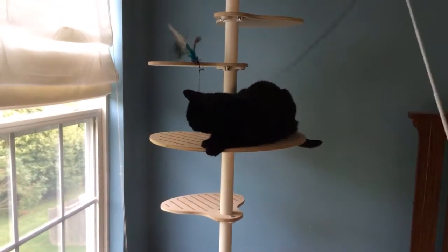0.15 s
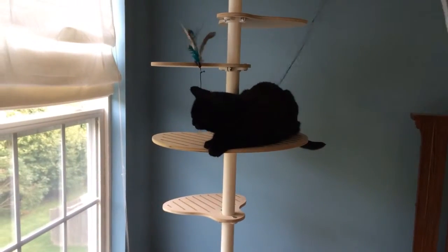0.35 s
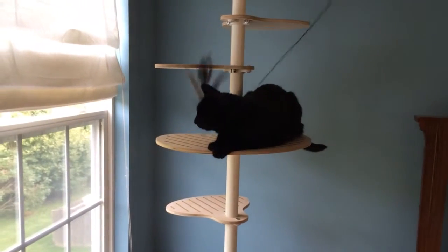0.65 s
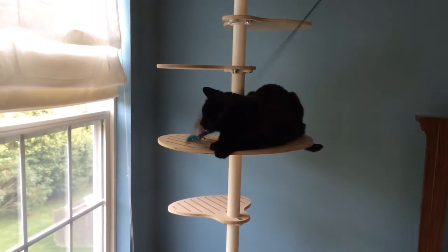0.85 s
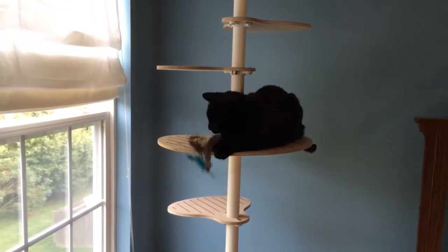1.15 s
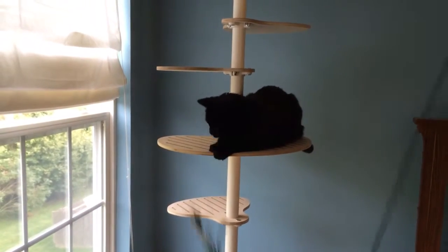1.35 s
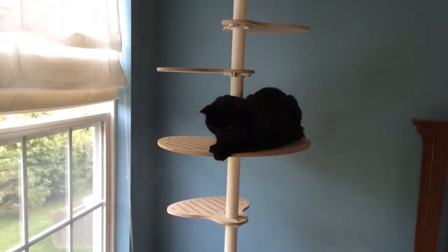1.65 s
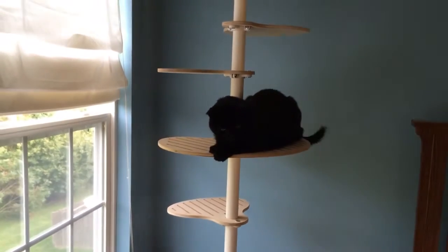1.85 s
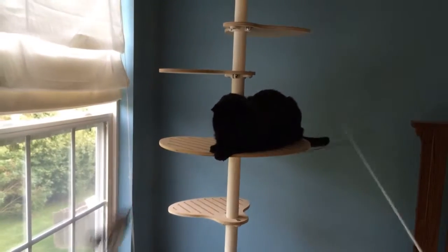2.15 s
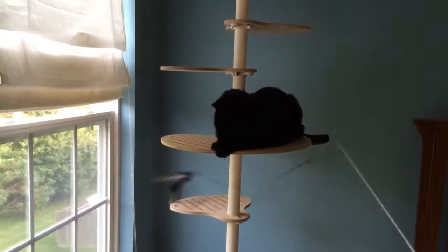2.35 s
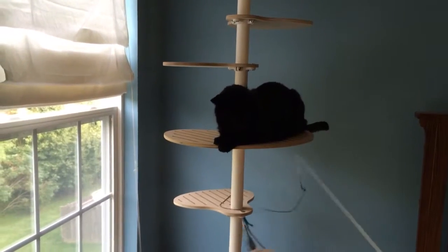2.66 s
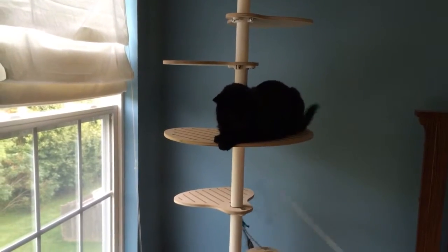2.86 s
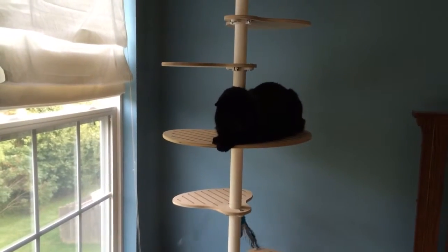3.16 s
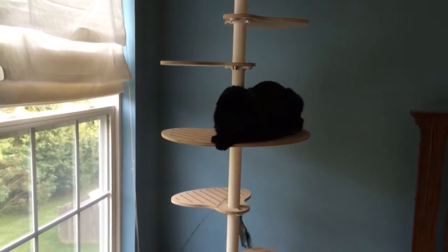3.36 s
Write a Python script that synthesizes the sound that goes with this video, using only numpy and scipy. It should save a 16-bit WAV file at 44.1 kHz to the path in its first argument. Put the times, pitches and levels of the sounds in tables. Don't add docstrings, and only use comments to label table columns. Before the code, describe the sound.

A toy rod taps a wooden shelf, slaps another hard, then rattles and ticks on a pole, with faint feather rustles and a tiny metal clink; small soft-furnished room, faint hiss and low hum.

```python
import sys
import numpy as np
from scipy import signal
from scipy.fft import rfft, irfft, next_fast_len
from scipy.io import wavfile

SR = 44100
rng = np.random.default_rng(int(sys.argv[2]) if len(sys.argv) > 2 else 0)


def to_wav(sig):
    pcm = np.clip(np.atleast_2d(sig), -1, 1) * 32767
    pcm = np.round(pcm).astype(np.int16)
    wavfile.write(sys.argv[1], SR, pcm.T)


def gain_from_db(level_db):
    decades = np.asarray(level_db, float) / 20
    return 10 ** decades


N = 154350
GRIT_DB = 1

# mode_hz, level_db, t60_s
POLE_MODES = [(480, -14, .12), (770, -18, .09), (1060, 0, .08), (1320, -1, .045), (1420, -3, .06),
              (1590, 1, .05), (1860, -6, .03), (1990, 2, .075), (2170, -3, .04), (2980, -9, .035),
              (3450, -5, .035), (3790, -5, .03), (4450, -8, .035), (5570, -10, .03)]
# freq_hz, level_db
POLE_CRACK = [(850, -31), (1100, -10.5), (2000, 1), (2600, -5.5), (3800, -5), (7000, -8.5), (15500, -25.5)]


def unit(x):
    return x / np.sqrt(np.mean(x ** 2) + 1e-20)


def unit_energy(x):
    return x / np.linalg.norm(x, axis=-1, keepdims=True)


def along(points, hz):
    point_hz, values = np.transpose(points)
    return np.interp(np.log(hz + 1), np.log(point_hz + 1), values)


def filtered(x, response):
    size = next_fast_len(x.shape[-1] + 8192)
    spectrum = rfft(x, size) * response(np.fft.rfftfreq(size, 1 / SR))
    return irfft(spectrum, size)[..., :x.shape[-1]]


def coloured(points):
    low_hz, high_hz = points[0][0], points[-1][0]

    def gain(hz):
        low_edge = np.clip(hz / low_hz, 0, 1) ** 5
        high_edge = np.clip(high_hz / (hz + 1), 0, 1) ** 2
        return gain_from_db(along(points, hz)) * low_edge * high_edge
    return gain


def grit(size, spread_db):
    return unit(rng.standard_normal(size) * gain_from_db(spread_db * rng.exponential(size=size)))


def air():
    # freq_hz, level_db per Hz
    rumble_colour = [(30, -22.5), (62, -5.5), (90, -9), (150, -14), (219, -11), (259, -18), (400, -19.5),
                     (600, -38.5)]
    # freq_hz, level_db per Hz
    hiss_colour = [(290, -21.5), (500, -3), (530, -6), (1720, -11), (1900, -11.5), (15400, -20)]
    rumble = unit(filtered(rng.standard_normal(N), coloured(rumble_colour)))
    hiss = unit(filtered(rng.standard_normal(N), coloured(hiss_colour)))
    opposed_s = 1.895
    turn = 2 * np.pi * (np.arange(N) / SR - opposed_s)
    first_motor = gain_from_db(-68) * np.sin(120.18 * turn)
    second_motor = gain_from_db(-71.5) * np.sin(116.82 * turn)
    return gain_from_db(-68) * rumble + gain_from_db(-75) * hiss + first_motor - second_motor


def feathers():
    # start_s (the peak), level_db, rise_s, fall_s, share of fine tips (0-1)
    brushes = [(.03, -74.5, .01, 0.013, 1), (.665, -64.5, .014, 0.022, 0.33), (1.07, -66, .004, .012, 0.4),
               (1.15, -68.5, .025, .022, 0.73), (1.185, -70, .011, 0.038, 0.8), (1.24, -74, .02, .04, 0.47),
               (1.82, -81, .01, .01, 0.9), (1.839, -70.5, .002, 0.014, 1), (1.96, -60.5, .002, .008, 0.02),
               (1.975, -66, .003, 0.018, 0.4), (2.016, -73, .003, 0.0065, .2),
               (2.022, -70, .003, 0.0065, 0.1), (2.44, -66.5, .034, 0.066, .5),
               (2.779, -63, .0032, 0.024, 0.36), (3.05, -73.5, .03, .05, 0.86),
               (3.201, -66.5, .029, .05, 0.06), (3.34, -68, .026, 0.033, 0.1)]
    # freq_hz, level_db
    vane_colour = [(2200, -4), (3500, 0.5), (7000, -1.5), (12000, -12), (15500, -11)]
    # freq_hz, level_db
    tip_colour = [(4000, -10), (7000, -3), (10000, -2.5), (15500, -6.5)]
    t = np.arange(N) / SR
    vanes = unit(filtered(grit(N, GRIT_DB), coloured(vane_colour)))
    tips = unit(filtered(grit(N, GRIT_DB), coloured(tip_colour)))
    out = np.zeros(N)
    for peak_s, level_db, rise_s, fall_s, fine in brushes:
        swell = np.exp(-np.where(t < peak_s, (peak_s - t) / rise_s, (t - peak_s) / fall_s))
        out += gain_from_db(level_db) * swell * ((1 - fine) * vanes + fine * tips)
    return out


def room(x):
    # freq_hz, t60_s
    decay_times = [(300, 0.34), (1200, 0.23), (4000, .24), (10000, 0.16), (15000, 0.097)]
    delay_s, late_db, late_longer = .005, -14.5, 2.37
    hz, t, grains = signal.stft(grit(SR // 2, .8), SR, nperseg=256)
    fall_db = -60 * t / along(decay_times, hz)[:, None]
    decay = np.hypot(gain_from_db(fall_db), gain_from_db(late_db + fall_db / late_longer))
    tail = signal.istft(grains * decay, SR, nperseg=256)[1]
    delayed = np.pad(x, (round(delay_s * SR), 0))
    return signal.fftconvolve(delayed, tail / np.linalg.norm(tail))


def near_db(hz, pitch_hz, reach_octaves):
    return -3 * (np.log2((hz + 1) / pitch_hz) / reach_octaves) ** 2


def knocks(contacts, modes, crack, low_hz, room_db):
    attack_s, swell_s = .0007, .001
    pitch_reach, reach_at_s = .3, .008
    crack_reach = 2.23
    scatter_db, detune = 1.2, .002
    ring_in_room_db = -2
    lead = 512
    out, t = np.zeros(N + SR), np.arange(SR // 5) / SR
    hz, mode_db, t60 = np.transpose(modes)[:, :, None]
    for start_s, level_db, length_s, pitch_hz, crack_db in contacts:
        push = grit(len(t), GRIT_DB) * (1 - np.exp(-t / attack_s)) * np.exp(-(t / length_s) ** 2)
        loaded_hz = hz * (1 + detune * rng.standard_normal(hz.shape))
        free = gain_from_db(-60 * t / t60) * np.sin(2 * np.pi * loaded_hz * t) * (1 - np.exp(-t / swell_s))
        push = np.pad(push, (lead, 0))[:len(t)]

        reach = pitch_reach * np.clip(reach_at_s / length_s, .3, 2.5)
        share_db = mode_db + near_db(hz, pitch_hz, reach) + scatter_db * rng.standard_normal(hz.shape)
        driven = signal.fftconvolve(push[None], free, axes=1)[:, :len(t)]
        ring = unit_energy(np.sum(gain_from_db(share_db) * unit_energy(driven), 0))

        def crack_colour(f):
            return coloured(crack)(f) * gain_from_db(near_db(f, pitch_hz, crack_reach))
        impulse = np.arange(len(t)) == lead
        snap, click = unit_energy(filtered(np.array([push, impulse]), crack_colour))

        gain = gain_from_db(level_db) * np.sqrt(length_s * SR)
        start = round(start_s * SR) - lead
        out[start:][:len(t)] += gain * (ring + gain_from_db(crack_db) * snap)
        echo = room(gain_from_db(ring_in_room_db) * ring + gain_from_db(crack_db) * click)
        out[start:][:len(echo)] += gain * gain_from_db(room_db) * echo
    return signal.sosfilt(signal.butter(5, low_hz, 'high', fs=SR, output='sos'), out[:N])


def upper_shelf_taps():
    # start_s, level_db, length_s, pitch_hz, crack over ring (dB)
    taps = [(.658, -70, 0.011, 1980, -2), (.66, -78.5, 0.051, 775, -10), (.665, -77.5, .025, 1120, -1),
            (.809, -50, 0.005, 930, 1), (.812, -44, 0.002, 910, -7), (.814, -43, 0.0011, 3715, 2),
            (.816, -37, 0.0011, 600, 4), (.8165, -43.5, 0.0022, 3750, 1), (.819, -44.5, 0.0022, 1560, 2),
            (.8285, -54, 0.0023, 1100, -11), (.833, -51, 0.0051, 610, -2), (1.73, -77, 0.018, 1920, -20)]
    # mode_hz, level_db, t60_s
    shelf_modes = [(400, -1, .06), (537, 0, .07), (590, -3, .05), (775, -5, .04), (960, -2, .045),
                   (1140, -3, .04), (1245, -5, .04), (1442, -2, .045), (1615, -3, .04), (1965, -8, .03),
                   (2130, -8, .03), (3112, -10, .03), (3715, -4, .014), (3900, -8, .018)]
    # freq_hz, level_db
    shelf_crack = [(300, -8.5), (913, -3.5), (3200, -14), (3700, -8.5), (4500, -15.5), (10000, -15),
                   (15500, -36)]
    return knocks(taps, shelf_modes, shelf_crack, low_hz=245, room_db=-8.5)


def rod_slap():
    # start_s, level_db, length_s, pitch_hz, crack over ring (dB)
    contacts = [(2.056, -67, 0.0035, 3050, 10), (2.064, -52.5, 0.0019, 4000, 3),
                (2.0675, -42.5, 0.0064, 4750, 2.5), (2.073, -45, 0.0082, 3500, 1),
                (2.0788, -29.5, 0.0023, 2490, 3.5), (2.0818, -26, 0.0015, 2960, 5),
                (2.0842, -22, .0028, 2390, 0), (2.0905, -27, 0.0019, 1410, -2),
                (2.092, -43, 0.0023, 9000, 9.5), (2.098, -30, .004, 1850, -8),
                (2.162, -52, 0.0023, 1800, 0.5), (2.171, -49, 0.0026, 2200, -4)]
    # mode_hz, level_db, t60_s
    struck_modes = [(225, -14, .07), (430, -9, .06), (670, -8, .06), (957, -8, .04), (1120, 2, .05),
                    (1246, -1, .05), (1418, -4, .04), (1613, 2, .04), (2080, -3, .035), (2233, -4, .03),
                    (2477, -4, .035), (2740, -5, .03), (3480, -1, .018), (4750, -6, .025)]
    # freq_hz, level_db
    slap_crack = [(330, -12.5), (1150, -3.5), (2900, -3), (3450, 2), (7000, -6), (11000, -13), (13500, -23),
                  (15500, -30.5)]
    return knocks(contacts, struck_modes, slap_crack, low_hz=190, room_db=-6.5)


def swivel_clinks():
    # start_s, level_db, length_s, pitch_hz, crack over ring (dB)
    clinks = [
        (2.399, -57.5, 0.0065, 5500, -5),
        (2.42, -74, .012, 5300, -8),
        (2.438, -73, .018, 5100, -5),
        (2.47, -77, .02, 5100, 4),
    ]
    # mode_hz, level_db, t60_s
    swivel_modes = [(2670, -2, .04), (5190, -5, .05), (5410, 1, .045), (7337, -5, .025), (9771, 1, .04)]
    return knocks(clinks, swivel_modes, POLE_CRACK, low_hz=500, room_db=-7)


def pole_rattle_and_taps():
    # start_s, level_db, length_s, pitch_hz, crack over ring (dB)
    rattle = [(2.458, -67.5, 0.025, 1950, -21), (2.493, -69.5, 0.012, 1990, 3),
              (2.5085, -44, 0.0042, 1610, -5), (2.5115, -44.5, .003, 1300, -5),
              (2.519, -55, 0.0037, 1990, -6), (2.521, -48.5, 0.0045, 3600, 0.5),
              (2.5395, -44.5, .003, 1900, -5), (2.5425, -45.5, 0.0048, 1590, 0.5),
              (2.549, -49.5, 0.0056, 3000, 3), (2.5555, -49, 0.0057, 1900, 0.5),
              (2.558, -47.5, 0.0066, 3790, 2.5), (2.565, -52.5, 0.0041, 1980, 9.5),
              (2.572, -57, 0.0067, 4400, 3), (2.581, -49.5, 0.015, 1970, -7.5),
              (2.592, -53.5, 0.011, 1980, 1.5), (2.603, -52.5, 0.0061, 1680, 4),
              (2.6105, -50, 0.0071, 3610, 0.5), (2.6165, -45, 0.0057, 1270, -10),
              (2.626, -77, 0.0077, 1985, -11), (2.638, -61, 0.017, 1050, -10)]
    # start_s, level_db, length_s, pitch_hz, crack over ring (dB)
    taps = [(2.784, -57.5, 0.0096, 1593, -5), (2.787, -59, 0.013, 2140, -1.5),
            (2.794, -69, 0.023, 1007, -24.5), (2.84, -73, .012, 1580, -4), (2.857, -72, .03, 1060, -4),
            (2.873, -77, 0.076, 3590, 2), (2.882, -75, 0.017, 1486, -3), (2.894, -59.5, 0.013, 1060, -9.5),
            (3.012, -72, 0.066, 2170, 0), (3.027, -66.5, 0.054, 1416, -8), (3.087, -79, 0.047, 3460, 5.5),
            (3.166, -69.5, 0.011, 1070, -17), (3.187, -67.5, 0.079, 1040, -6.5),
            (3.234, -71.5, 0.084, 3430, -2.5), (3.273, -40.5, 0.0037, 1320, -8.5),
            (3.285, -58.5, 0.022, 1980, -24), (3.277, -63, .012, 4420, -5),
            (3.293, -67.5, 0.057, 1030, -1.5), (3.338, -59, 0.0066, 4950, 2.5),
            (3.344, -74, 0.049, 1470, 6), (3.385, -73, 0.037, 1050, -2.5), (3.42, -73.5, 0.045, 1460, -2),
            (3.45, -60.5, 0.0054, 1540, -11), (3.456, -72, 0.028, 1050, -2.5)]
    return knocks(rattle + taps, POLE_MODES[2:], POLE_CRACK, low_hz=930, room_db=-7.5)


def pole_sway():
    # start_s, level_db, length_s, pitch_hz, crack over ring (dB)
    pushes = [
        (2.55, -67, .06, 480, -20),
        (2.57, -72, .05, 770, -20),
        (2.843, -77, .084, 475, -24),
        (3.205, -72, .04, 770, -20),
        (3.23, -75, .08, 480, -20),
        (3.37, -78, .04, 770, -18),
    ]
    return knocks(pushes, POLE_MODES, POLE_CRACK, low_hz=200, room_db=-8)


def scene():
    brush = feathers()
    brush_in_room = gain_from_db(-9.0) * room(brush)[:N]
    shelves = upper_shelf_taps() + rod_slap()
    pole = pole_rattle_and_taps() + pole_sway()
    return (air() + brush + brush_in_room + shelves + swivel_clinks() + pole)[None]


def roll_off(x):
    return signal.sosfilt(signal.butter(12, 15680, fs=SR, output="sos"), x)


def record(dry):
    top_hz = 15470
    mix = filtered(dry, lambda hz: hz < top_hz)
    return roll_off(mix)


dry = scene()
out = record(dry)
to_wav(out)
```